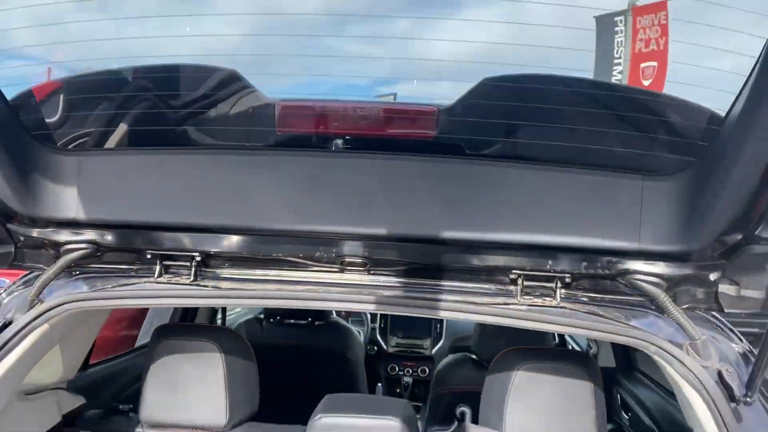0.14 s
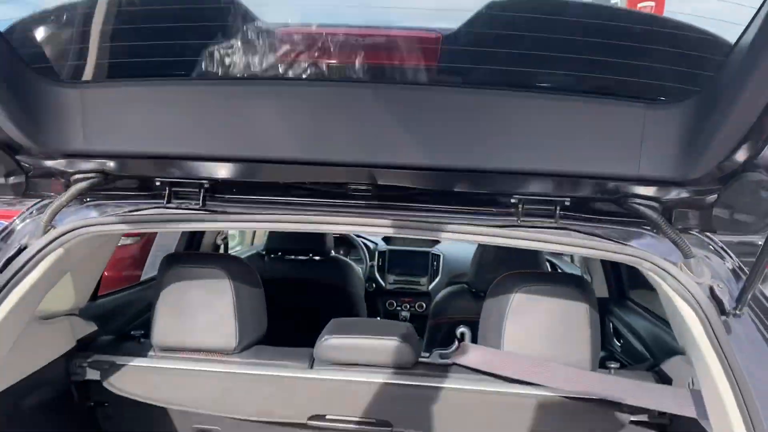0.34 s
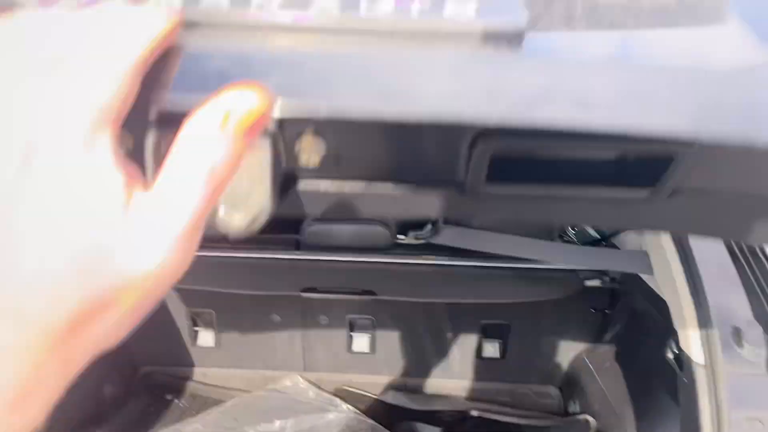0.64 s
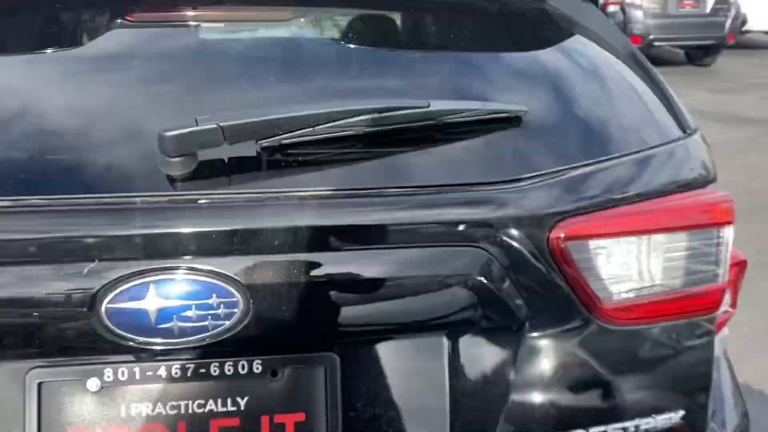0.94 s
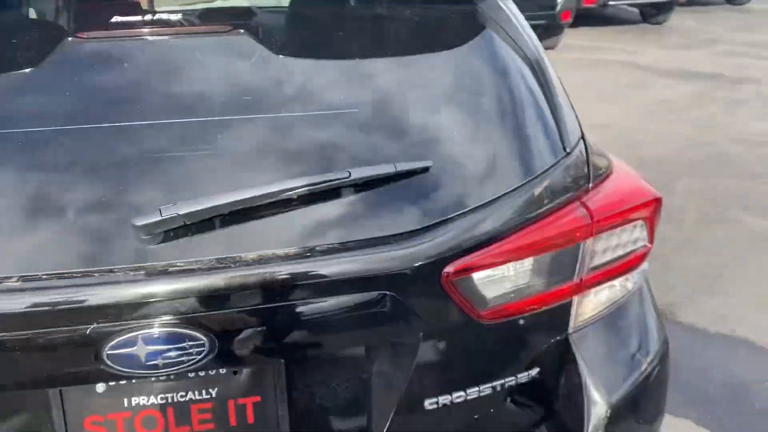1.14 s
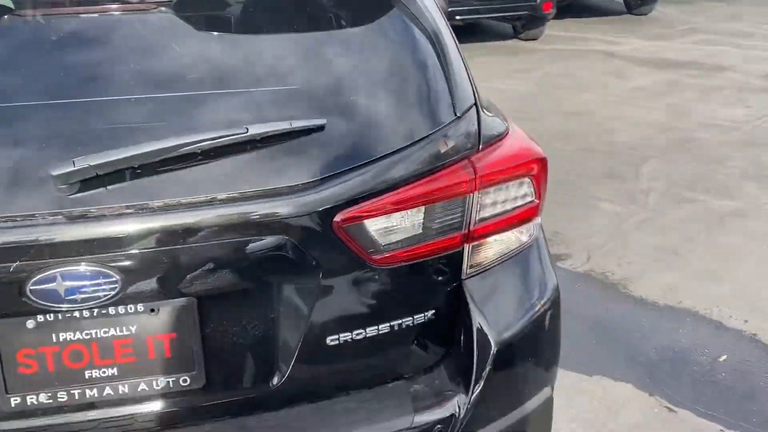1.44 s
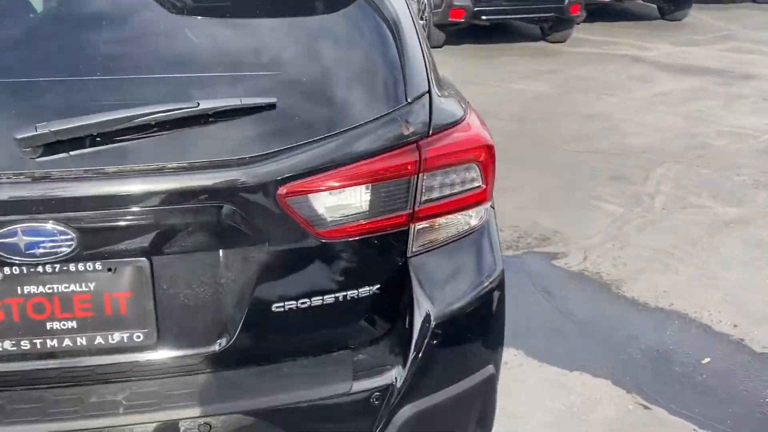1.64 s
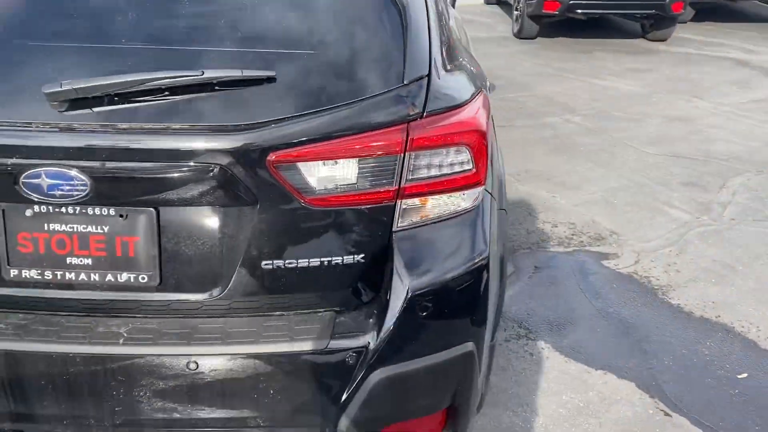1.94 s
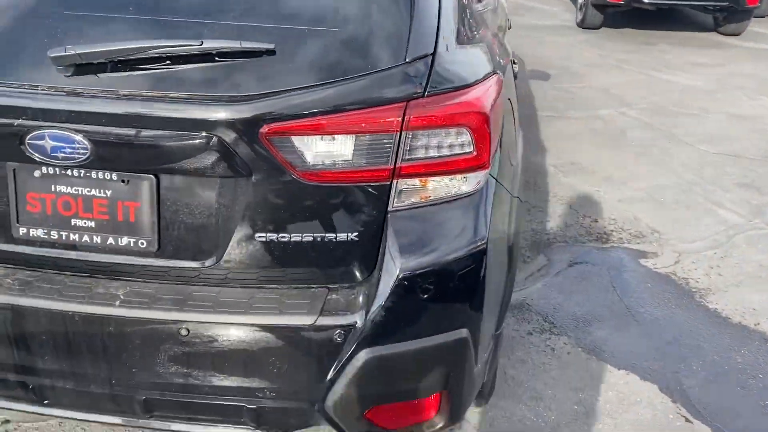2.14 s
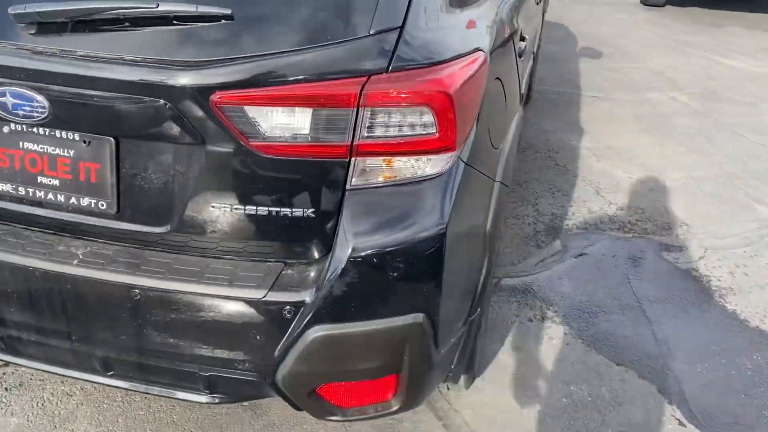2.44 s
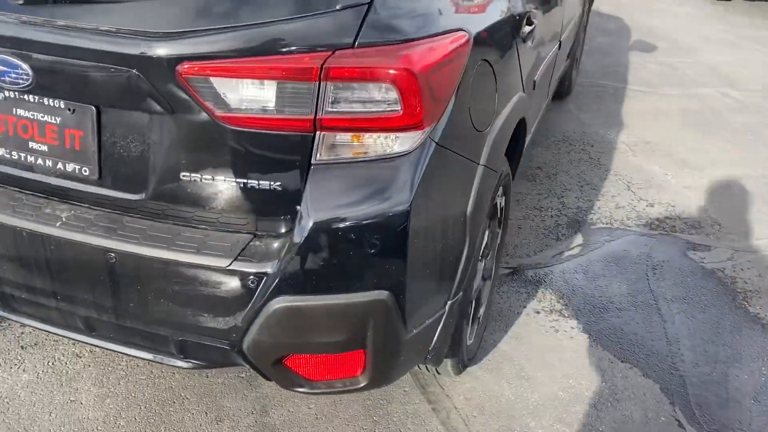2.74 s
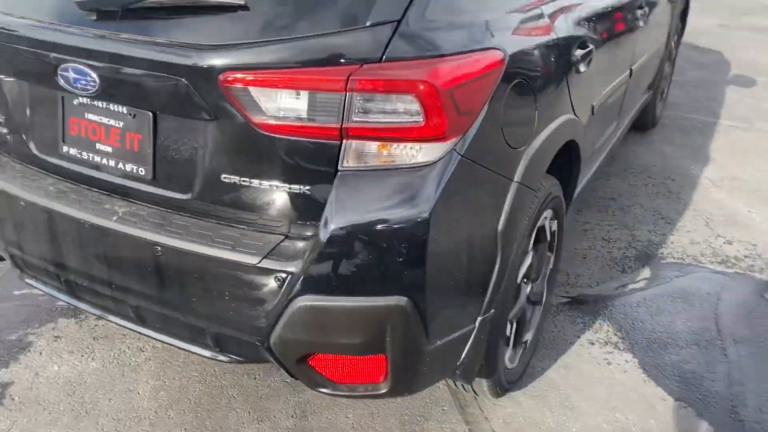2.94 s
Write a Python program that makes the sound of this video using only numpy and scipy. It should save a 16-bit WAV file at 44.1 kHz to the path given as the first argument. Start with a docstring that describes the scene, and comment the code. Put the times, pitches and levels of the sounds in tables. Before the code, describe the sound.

Gusty wind buffets the microphone outdoors, and a car tailgate slams shut once.

```python
"""A car park, where gusty wind tears across a phone microphone. Turbulence at its two ports makes a low rumble,
a fluttering roar, crackle, snaps and brief throbs; these reach the left port brighter and a little later, and
the strongest peaks overload. Far traffic hums underneath. A tailgate slams once: a sharp snap (kept with the
wind's snaps, at 1.055 s), then a burst of clatter, with knocks that ring the damped modes of its panel."""
import sys
import numpy as np
from scipy import signal
from scipy.fft import rfft, irfft, next_fast_len
from scipy.io import wavfile
from scipy.ndimage import uniform_filter1d, minimum_filter1d, map_coordinates

SR = 44100
rng = np.random.default_rng(int(sys.argv[2]) if len(sys.argv) > 2 else 0)


def persist_wave(psi):
    """Save psi, clipped to +-1, as 16-bit WAV."""
    counts = np.round(np.clip(psi, -1, 1) * 32767).astype(np.int16)
    wavfile.write(sys.argv[1], SR, np.atleast_2d(counts).T)


N = 136710

# Gust strength. Each row: time in seconds, roar level in dB, crackle level in dB.
GUSTS = [(0, -38, -37), (.072, -33.5, -68.5), (.126, -14, -34), (.18, -22, -67), (.238, -36.5, -70),
         (.4, -39.5, -68.5), (.495, -10.5, -32.5), (.53, -9.5, -44.5), (.546, -19, -57),
         (.658, -9.5, -29.5), (.76, -12, -33), (.788, -19.5, -37), (.822, -26.5, -62.5),
         (.896, -16.5, -33.5), (.94, -30, -58), (.97, -11.5, -24), (.984, -29, -45), (1.066, -13, -12.5),
         (1.116, -17, -27.5), (1.2, -30, -33.5), (1.228, -42, -61.5), (1.305, -26, -56.5),
         (1.33, -31.5, -61), (1.418, -59.5, -52.5), (1.62, -46.5, -52), (1.79, -40.5, -67),
         (1.844, -12, -26.5), (1.88, -11.5, -27), (1.915, -23, -56), (1.956, -11, -23), (2.042, -10.5, -20),
         (2.056, -18.5, -33.5), (2.18, -11.5, -19.5), (2.25, -11, -27), (2.332, -14, -23),
         (2.362, -19.5, -30.5), (2.384, -13, -17.5), (2.432, -15.5, -23.5), (2.462, -21.5, -31.5),
         (2.482, -10, -24), (2.6, -14, -23.5), (2.715, -16, -30), (2.746, -18.5, -22.5),
         (2.764, -19.5, -34), (2.87, -23, -43), (2.89, -19, -24.5), (2.968, -24, -49.5), (3.016, -46, -64),
         (3.1, -33.5, -93)]
EDDY_RISE_S = 0.00047


def amp(db):
    return 10 ** (np.asarray(db) / 20)


def unit(x):
    return x / np.sqrt(np.mean(x ** 2) + 1e-20)


def along(points, hz):
    """Interpolation on a logarithmic frequency axis."""
    f, v = np.transpose(points)
    return np.interp(np.log(hz + 1), np.log(f + 1), v)


def curves(rows):
    """Linear interpolation in time: one value per sample for each later column."""
    s, *cols = np.transpose(rows)
    return [np.interp(np.arange(N) / SR, s, c) for c in cols]


def wobble(rate):
    """Smooth random modulation: a spline through rate knots a second."""
    return map_coordinates(rng.standard_normal(N // 100), [np.arange(N) * rate / SR])


def filtered(x, response):
    """Linear filtering: the spectrum times a complex frequency response."""
    m = next_fast_len(x.shape[-1] + 8192)
    return irfft(rfft(x, m) * response(np.fft.rfftfreq(m, 1 / SR)), m)[..., :x.shape[-1]]


def noise(spectrum, speed=None):
    """Two independent noises of one colour, rms 1; reading them faster raises every frequency."""
    white = rng.standard_normal((2, 2 * N))
    pair = filtered(white, lambda hz: amp(along(spectrum, hz) - 120 * (hz < spectrum[0][0])))
    place = np.arange(N) if speed is None else np.cumsum(speed / speed.mean())
    return unit(np.array([map_coordinates(v, [place]) for v in pair]))


def pulses(times, levels_db, rise_s, fall_s):
    """Convolution places a quick swell and an exponential decay at each time."""
    t = np.arange(SR // 10) / SR
    shape = (1 - np.exp(-t / rise_s)) * np.exp(-t / fall_s)
    marks = np.bincount(np.round(np.asarray(times) * SR).astype(int), amp(levels_db), N)[:N]
    return signal.fftconvolve(marks, shape / shape.max())[:N]


def ports(pair, coherence, tilt=((1, 0), (2, 0))):
    """Partial coherence: left gets the first signal; right gets it early, blended with the second."""
    # Each row: frequency in Hz, phase lag of the left port in radians.
    left_lag = [(0, .05), (200, .58), (600, 1.05), (1200, 1.45), (1600, 3.2), (2300, 4.4), (4500, 4.7),
                (6000, 9.3), (9000, 15.7), (16000, 25.5)]

    def blend(hz):
        share = np.clip(along(coherence, hz), 0, 1)
        lead = np.exp(1j * np.interp(hz, *np.transpose(left_lag)))
        return np.array([share * lead, np.sqrt(1 - share ** 2)]) * amp(-along(tilt, hz))
    return np.array([pair[0], filtered(pair, blend).sum(axis=0)])


def rumble(flutter_db):
    """Slow turbulent pressure swings: a deep rumble, and a thump modulated by the flutter."""
    # Each row: time in seconds, rumble level in dB, thump level in dB.
    levels = [(0, -33, -40), (.142, -24.5, -20.5), (.378, -30.5, -46.5), (.494, -15.5, -11.5),
              (.548, -13, -15.5), (.588, -19.5, -22.5), (.77, -9.5, -19.5), (.814, -30.5, -26.5),
              (.876, -13.5, -24), (.952, -35.5, -44.5), (1.01, -17, -23.5), (1.318, -16, -22),
              (1.444, -29, -58), (1.6, -42.5, -62), (1.644, -18, -26.5), (1.716, -20.5, -18),
              (1.766, -27, -33.5), (1.812, -24, -15), (1.842, -16, -16.5), (2.63, -18.5, -17.5),
              (2.88, -26.5, -17), (2.978, -21.5, -26.5), (3.03, -32, -37)]
    # Each row: frequency in Hz, relative spectral density in dB.
    rumble_spectrum = [(20, -43), (35, -12.5), (55, 1.5), (80, 2.5), (120, -4), (170, -12.5), (300, -67.5)]
    thump_spectrum = [(70, -25), (110, 0.5), (160, 0), (230, -6.5), (330, -15), (600, -73)]
    rumble_db, thump_db = curves(levels)
    thump = amp(thump_db) * unit(amp(0.99 * flutter_db))
    return amp(rumble_db) * noise(rumble_spectrum) + thump * noise(thump_spectrum)


def roar(flutter_db, speed):
    """Turbulent noise, amplitude-modulated by gusts, flutter and sharp eddies."""
    # Each row: start of an eddy in seconds, peak envelope level in dB.
    eddies = [(0.099, -14.5), (.124, -20.5), (0.3139, -23), (0.4137, -22), (.4428, -16), (.4823, -14),
              (0.5624, -14), (0.638, -16), (0.752, -11), (0.8457, -15.5), (0.9663, -23), (1.0069, -12),
              (1.1648, -9.5), (1.197, -10.5), (1.249, -35), (1.292, -35), (1.828, -14), (1.9632, -19),
              (2.1182, -19), (2.1367, -28.5), (2.3357, -10.5), (2.4789, -15), (2.7249, -13.5)]
    # Each row: frequency in Hz, relative spectral density in dB.
    spectrum = [(100, -12.5), (220, -2.5), (500, -4), (900, -8.5), (1400, -17.5), (2500, -33.5),
                (4000, -59.5)]
    roar_db, _ = curves(GUSTS)
    swells = pulses(*np.transpose(eddies), EDDY_RISE_S, fall_s=0.007)
    return (amp(roar_db) * unit(amp(0.81 * flutter_db)) + swells) * noise(spectrum, speed)


def small_eddies(per_s=480):
    """A Poisson process: the envelope of tiny eddies of chance time and size."""
    gap, size = rng.random((2500, 2)).T
    starts = np.cumsum(-np.log(gap) / per_s)
    levels_db = -2.5 - 3.5 * np.log(np.maximum(size, .04))
    return pulses(starts, levels_db, EDDY_RISE_S, fall_s=0.00044)


def crackle(flutter_db, speed, spits):
    """Small eddies modulate bright noise; by a power law, a higher fizz swings wider in level."""
    # Each row: frequency in Hz, relative spectral density in dB.
    crackle_spectrum = [(700, 4), (1400, -1), (2200, 1), (3200, -9), (4500, -22.5), (6000, -68)]
    fizz_spectrum = [(2000, -13), (3200, 3.5), (4500, 5), (5500, 1), (6500, -9.5), (8000, -33)]
    _, crackle_db = curves(GUSTS)
    envelope = amp(crackle_db) * unit(amp(0.07 * flutter_db)) * unit(1 + spits)
    pivot_db = -18
    fizz = amp(pivot_db - 8.5) * np.abs(envelope / amp(pivot_db)) ** 1.74
    return envelope * noise(crackle_spectrum, speed) + fizz * noise(fizz_spectrum, speed)


def wind(ceiling=1.05, knee=3):
    """Common modulation by air speed: faster is louder and brighter. Peaks saturate at the ports."""
    # Flutter of the air speed. Each row: knots per second, depth in dB.
    flutter = [(45, 1.5), (140, 3), (400, 2.5)]
    # Each row: frequency in Hz, coherence of the ports from 0 to 1.
    coherence = [(50, 0.91), (140, 0.97), (450, 0.69), (1000, 0.93), (1600, 0.38), (3000, 0), (5500, 1),
                 (7200, 0), (9000, 0.7)]
    # Each row: frequency in Hz, attenuation at the right port in dB.
    right_loss = [(100, 0), (700, 1), (1300, 4.5), (2400, 13.5), (4400, 23), (6500, 18.5), (9000, -0.5)]
    # What a port passes of the wind. Each row: frequency in Hz, gain in dB.
    port_gain = [(5500, 0), (7000, -2), (8200, -9.5), (9500, -38), (12000, -56.5)]
    spits = small_eddies()
    flutter_db = sum(depth_db * wobble(rate) for rate, depth_db in flutter)
    speed = np.exp(.15 * unit(flutter_db))
    air = rumble(flutter_db) + roar(flutter_db, speed) + crackle(flutter_db, speed, spits)
    pressure = ports(air + snaps() + throbs(), coherence, right_loss)
    overloaded = pressure / (1 + np.abs(pressure / ceiling) ** knee) ** (1 / knee)
    return filtered(overloaded, lambda hz: amp(along(port_gain, hz)))


def traffic():
    """Far traffic as weakly coherent noise: a dull hum and a thin hiss whose levels drift."""
    # Each row: time in seconds, hum level in dB, hiss level in dB.
    levels = [(0, -46, -75), (.5, -42.5, -63.5), (1.2, -52, -80), (1.4, -44, -67), (1.9, -43, -66),
              (3.1, -50, -83)]
    # Each row: frequency in Hz, relative spectral density in dB.
    hum_spectrum = [(150, 6), (300, -5), (900, 1.5), (1400, -1), (2500, -4), (2900, -14), (5000, -21),
                    (8000, -28), (10000, -63.5)]
    hiss_spectrum = [(7000, -6.5), (11000, 23), (15800, 0)]
    # Each row: frequency in Hz, coherence of the ports from 0 to 1.
    coherence = [(300, 0.36), (2000, 0.17), (8000, 0.34)]
    hum_db, hiss_db = curves(levels)
    hum = amp(hum_db + wobble(2.1)) * noise(hum_spectrum)
    return ports(hum + amp(hiss_db) * noise(hiss_spectrum), coherence)


def snaps(scatter_s=.0009):
    """Pressure impulses at the port: each snap is three close, filtered spikes of chance sign. The snap at
    1.055 s is the tailgate's slam striking."""
    # Each row: time in seconds, spike level before filtering in dB.
    events = [(0.4906, -20), (0.498, -26.5), (0.6362, -24), (.6589, -24), (0.7087, -31), (0.7379, -19),
              (0.7539, -11.5), (0.7679, -18.5), (0.7823, -15), (.8033, -21.5), (0.8788, -21), (1.0057, -25),
              (1.0469, -13), (1.055, -12), (1.1421, -10.5), (1.164, -17), (1.1806, -21), (1.1971, -19),
              (1.8313, -19), (1.872, -12.5), (1.962, -9.5), (1.9927, -12.5), (2.0147, -20.5),
              (2.0195, -14.5), (2.027, -22.5), (2.0399, -7.5), (2.1377, -22), (2.161, -14.5), (2.192, -13),
              (2.269, -22.5), (2.3396, -11.5), (2.3766, -13.5), (2.4345, -15.5), (2.483, -8), (2.5434, -24),
              (2.6, -31), (2.6697, -17), (2.7257, -21), (2.7433, -15.5), (2.8407, -26)]
    # Each row: frequency in Hz, filter gain in dB.
    colour = [(400, 14.5), (1200, 26.5), (3500, 16), (5500, 9), (7000, -10)]
    times, db = np.transpose(events)
    offset, sign = rng.random((len(times), 2, 3)).transpose(1, 2, 0) - .5
    samples = np.round((times + scatter_s * offset) * SR).astype(int)
    spikes = np.bincount(samples.ravel(), (amp(db) * np.sign(sign)).ravel(), N)
    return filtered(spikes, lambda hz: amp(along(colour, hz)))


def tailgate(slam_s=1.057, rise_s=0.004, hold_s=0.051, burst_t60_s=0.13, knock_t60_s=0.0091):
    """Impact excitation: a burst of clatter, with knocks that ring the panel's damped modes."""
    # Each row: start of a knock in seconds, peak envelope level in dB.
    knocks = [(1.0627, -20.5), (1.0729, -9.5), (1.0875, -12.5), (1.1001, -13), (1.13, -34)]
    # Each row: frequency in Hz, relative spectral density in dB.
    spectrum = [(710, -13.5), (1200, 0), (1790, -0.5), (2500, -14), (4470, -8.5), (9120, -15.5),
                (10300, -15), (15800, -24.5)]
    # Each row: frequency in Hz, typical level at the hardest knock in dB, seconds to fall 60 dB.
    modes = [(1800, -9.5, 0.047), (3610, -19, 0.036), (5330, -27, 0.025)]
    # Each row: frequency in Hz, coherence of the ports from 0 to 1.
    coherence = [(1000, 1), (4000, 0.16), (8000, 1)]
    t = np.arange(N) / SR
    fall_db = 60 * np.clip(t - slam_s - hold_s, 0, 2) / burst_t60_s
    burst = np.clip((t - slam_s) / rise_s, 0, 1) * amp(-26.5 - fall_db)
    starts, peaks_db = np.transpose(knocks)
    impacts = pulses(starts, peaks_db, rise_s=0.00024, fall_s=knock_t60_s / np.log(1000))
    clatter = (burst + impacts) * noise(spectrum)
    for start, knock_db in knocks:
        age = np.clip(t - start, 0, 1)
        for hz, mode_db, t60 in modes:
            onset_db = knock_db - peaks_db.max() + mode_db + rng.normal(0, 2.1, (2, 1))
            clatter += amp(onset_db - 60 * age / t60) * np.sin(2 * np.pi * hz * age)
    return ports(clatter, coherence)


def throbs():
    """Near-periodic buffeting: the air swings for a few cycles at one pitch."""
    # Each row: start in seconds, frequency in Hz, peak level in dB, length in seconds.
    buffets = [(1.245, 136.7, -17, 0.032), (1.31, 105.7, -11, 0.027), (1.797, 158.5, -9, 0.02)]
    t = np.arange(N) / SR
    pressure = np.zeros(N)
    for start, hz, db, length in buffets:
        window = np.sin(np.pi * np.clip((t - start) / length, 0, 1)) ** .5
        pressure += amp(db) * window * np.sin(2 * np.pi * hz * (t - start))
    return pressure


def scene():
    """Superposition: the pressures of the sources add at each port."""
    return wind() + tailgate() + traffic()


def record(dry):
    """Peak limiting with one gain for both channels, then a band limit."""
    full_scale, limiter_s, top_hz = .95, .004, 15830
    span = round(limiter_s * SR)
    needed_gain = np.minimum(1, full_scale / (np.abs(dry).max(axis=0) + 1e-9))
    gain = uniform_filter1d(minimum_filter1d(needed_gain, span), span)
    return filtered(dry * gain, lambda hz: hz < top_hz)


dry = scene()
out = record(dry)
persist_wave(out)
```